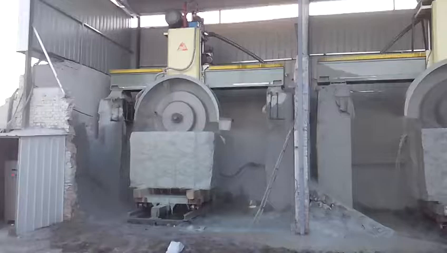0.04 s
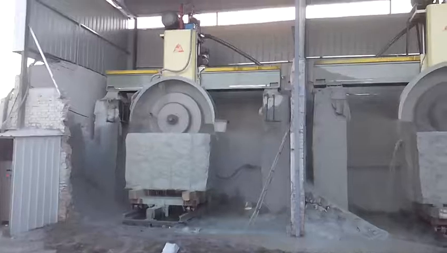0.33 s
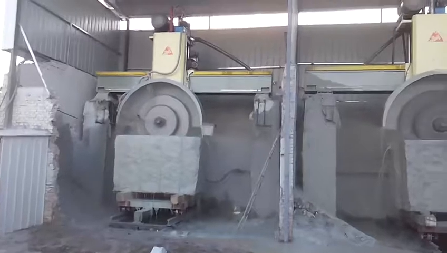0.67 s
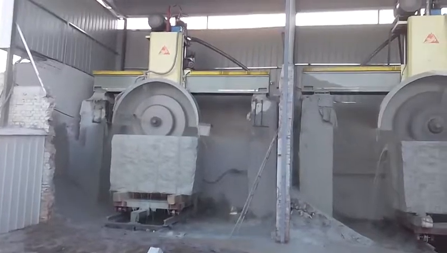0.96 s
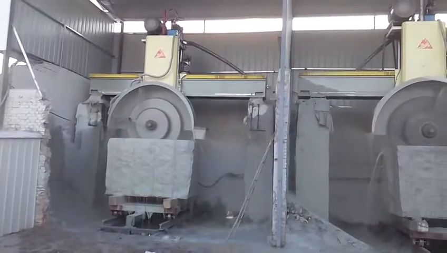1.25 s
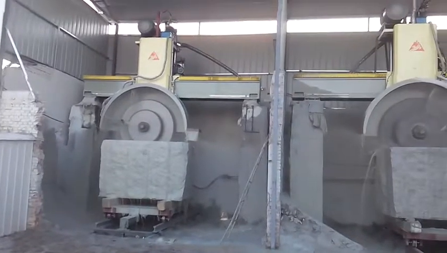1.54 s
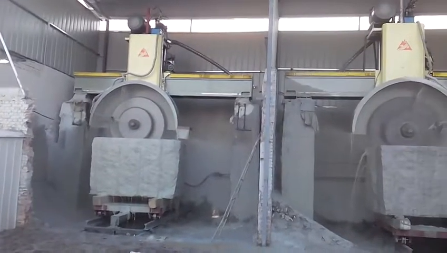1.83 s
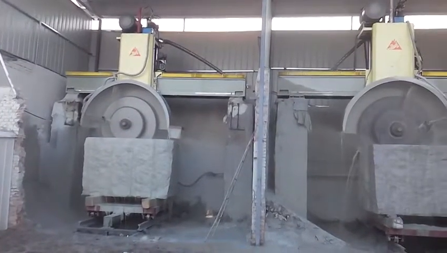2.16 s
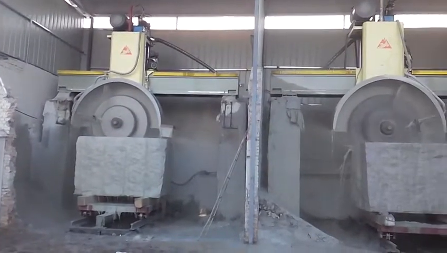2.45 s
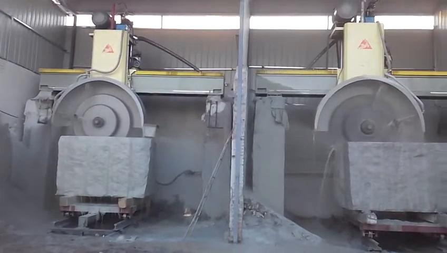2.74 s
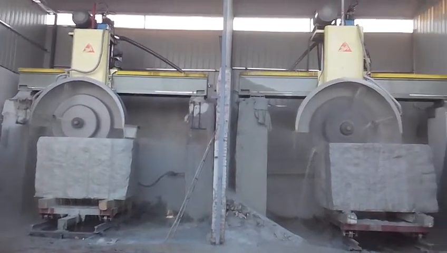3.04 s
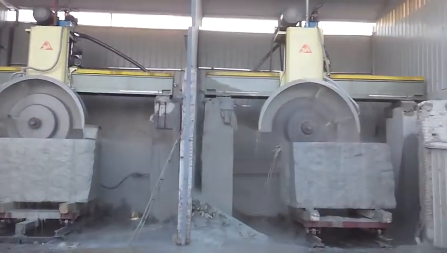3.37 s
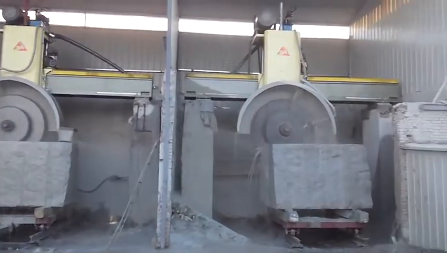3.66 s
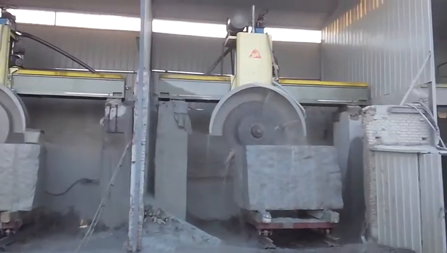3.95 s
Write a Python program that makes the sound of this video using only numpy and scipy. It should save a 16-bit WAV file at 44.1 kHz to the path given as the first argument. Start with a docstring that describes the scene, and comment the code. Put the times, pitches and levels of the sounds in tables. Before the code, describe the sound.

Big stone saws grind steadily in a shed, droning and rasping over a hiss of water.

```python
"""Stone saws in a steel shed

One mono microphone stands among two big circular saws cutting stone blocks, turning slowly between them.
The same uneven teeth meet the stone on every turn, so the blades drone and throb five times a second.
Crushed grit roars and makes the steel ring, and a binding blade squeals briefly. Behind the saws,
cooling water hisses in the cut and the shed rumbles underneath."""
import sys
import numpy as np
from scipy import signal
from scipy.fft import rfft, irfft
from scipy.io import wavfile
from scipy.ndimage import uniform_filter1d, minimum_filter1d

SR = 44100
rng = np.random.default_rng(int(sys.argv[2]) if len(sys.argv) > 2 else 0)


def wrap_up_sound(samples):
    """Save the sound to the file named by the first command line argument, as 16-bit audio."""
    columns = np.atleast_2d(samples).T
    # keep every value between -1 and 1, then stretch to whole-number steps
    tamed = np.clip(columns, -1, 1)
    steps = np.round(tamed * 32767).astype(np.int16)
    wavfile.write(sys.argv[1], SR, steps)


N = 176400
T = np.arange(N) / SR
TURNS_PER_S, CONTACTS_PER_TURN = 5.04, 480
GRAINS_PER_S, GRAIN_SPREAD_DB = 14000, 2
FLUTTER_DB, FLUTTER_HZ = 1.2, 5

# Spectra of the shed, the cooling water and the crushed stone: pitch_hz, level_db_per_hz
SHED_SPECTRUM = [(12, -67), (24, -65), (44, -78.5), (72, -68), (95, -70), (150, -68), (400, -80)]
WATER_SPECTRUM = [(1500, -60), (3500, -60), (5000, -56), (5800, -57), (6600, -59), (7300, -61.5),
                  (8200, -68.5), (10000, -73), (14000, -79.5)]
GRIT_SPECTRUM = [(110, -62), (195, -57.5), (280, -53), (380, -53.5), (520, -55.5), (700, -51), (870, -53.5),
                 (1020, -50), (1220, -53.5), (1700, -50), (2500, -54), (3100, -58), (4300, -59),
                 (7000, -78)]
# The thin ring of a blade: pitch_hz, width_hz, level_db
WHINE_MODES = [(4590, 39, -34.5), (4760, 87, -38.5)]
# Moments when the blade binds in the cut: peak_s, rise_db
BINDS = [(.31, 7), (.66, 9), (1.08, 7), (1.2, 7), (1.66, 6), (1.9, 11), (2.4, 6)]
# Steel resonances rubbed by grit: pitch_hz, width_hz, level_db, trend_db_per_s, flutter_db
STEEL_MODES = [(376.5, 104, -30.5, -0.5, -1.1), (725, 128, -29, -0.7, -0.5), (1411, 76, -31.5, -1, 3),
               (3764, 460, -31.5, -1.5, -1)]
# Each saw's rasp and the blades' sizzle at the microphone: time_s, level_db
LEFT_RASP_CURVE = [(0, -24.5), (.52, -23), (.88, -22), (1.08, -25.5), (2.5, -23.3), (4, -23)]
RIGHT_RASP_CURVE = [(0, -25.5), (2.85, -24), (3.35, -22.5), (3.6, -21.5), (4, -23.5)]
SIZZLE_CURVE = [(0, -27), (1.6, -26.5), (2.1, -25.7), (2.6, -26), (4, -27)]
# How far the microphone favours the right-hand saw: time_s, facing_db
MIC_FACING = [(0, -2.5), (1, -1.7), (2, .7), (2.7, 1.2), (4, 0)]
# Tones the blades sing: cycles_per_turn, level_db, db_per_facing_db, swell_db, swell_peak_s
BLADE_TONES = [(50, -26.4, .8, 2, .06), (54, -29.7, 1, 1, .02), (67, -30.5, 0, 8, .1),
               (138, -30.7, -.4, 2.5, .05), (150, -34.5, -2.6, 2.5, .04)]
# Resonances struck by the teeth: pitch_hz, width_hz, level_db, trend_db_per_s, swell_db, swell_peak_s
BLADE_MODES = [(80, 18, -51, 0, 1, .1), (130, 30, -41.5, 0, 1, .11), (193, 24, -31, -.4, 3, .07),
               (243, 26, -33, .6, 1, .04), (286, 40, -31, .4, 7, .14), (384, 40, -30, 0, 2, .04),
               (632, 35, -33.5, 0, 1.5, .08), (745, 80, -28, -.7, 2.5, .04), (985, 130, -32, 0, 1, .15),
               (1660, 400, -27.3, -.6, .5, .1), (2200, 450, -33, .5, .3, .1)]


def from_db(db):
    """Decibels to gain."""
    return 10 ** (np.asarray(db) / 20)


def rms_one(x):
    """Scale to rms 1."""
    return x / np.sqrt(np.mean(x ** 2) + 1e-20)


def drift(rate_hz):
    """Slow random movement, rms 1."""
    step, settle = 40, 2000
    pole = np.exp(-2 * np.pi * rate_hz * step / SR)
    noise = rng.standard_normal(N // step + settle + 2)
    slow = signal.lfilter([1], [1, -2 * pole, pole * pole], noise)[settle:]
    return np.interp(np.arange(N) / step, np.arange(len(slow)), rms_one(slow))


def colour(white, spectrum):
    """Give a white signal of rms 1 a spectrum in dB per Hz, falling away beyond its ends."""
    hz, db = np.transpose(spectrum)
    bins_hz = np.maximum(np.arange(N // 2 + 1) * SR / N, 1)
    gain = from_db(np.interp(np.log(bins_hz), np.log(hz), db))
    skirts = np.minimum(1, np.minimum(bins_hz / hz[0], hz[-1] / bins_hz)) ** 2
    return irfft(rfft(white) * gain * skirts, N) * np.sqrt(SR / 2)


def resonate(x, hz, width_hz):
    """A steep-sided resonance, rms 1."""
    edges = [max(hz - width_hz / 2, 20), hz + width_hz / 2]
    return rms_one(signal.sosfilt(signal.butter(2, edges, "band", fs=SR, output="sos"), x + 1e-18))


def swell(depth_db, peak_s):
    """A gain that rises and falls once a turn, as the wobbling blade leans on the cut."""
    return rms_one(from_db(depth_db * np.cos(2 * np.pi * TURNS_PER_S * (T - peak_s))))


def mic_turn(level_db, db_per_s):
    """A gain that slides slowly as the microphone turns from one saw to the other."""
    return from_db(level_db + db_per_s * (T - T.mean()))


def shed_rumble():
    """The shed rumbles low and steady around the microphone."""
    return colour(rng.standard_normal(N), SHED_SPECTRUM)


def cooling_water():
    """Water hisses steadily in the cut."""
    return colour(rng.standard_normal(N), WATER_SPECTRUM)


def grit():
    """Dense random fractures of uneven size, rms 1."""
    sizes = from_db(GRAIN_SPREAD_DB * np.minimum(rng.exponential(1, N), 5))
    signs = rng.choice([-1, 1], N)
    breaks = rng.random(N) < GRAINS_PER_S / SR
    return rms_one(sizes * signs * breaks)


def blade_whine(squeal_s=.028, flutter_db=1):
    """Two high modes ring together and flare into squeals when the blade binds."""
    flare_db = sum(rise_db * np.exp(-((T - peak_s) / squeal_s) ** 2) for peak_s, rise_db in BINDS)
    gain = from_db(flare_db + flutter_db * drift(FLUTTER_HZ))
    return gain * sum(from_db(db) * resonate(grit(), hz, width) for hz, width, db in WHINE_MODES)


def grinding():
    """Crushed stone roars and sets the steel ringing, fluttering with the load."""
    steel = 0
    for hz, width, db, trend, flutter_db in STEEL_MODES:
        flutter = rms_one(from_db(flutter_db * drift(FLUTTER_HZ)))
        steel += mic_turn(db, trend) * flutter * resonate(grit(), hz, width)
    left = rasp(LEFT_RASP_CURVE, hz=1706, width_hz=330)
    right = rasp(RIGHT_RASP_CURVE, hz=2268, width_hz=440)
    sizzle = rasp(SIZZLE_CURVE, hz=6204, width_hz=590)
    return steel + left + right + sizzle + colour(grit(), GRIT_SPECTRUM)


def rasp(curve, hz, width_hz):
    """Grit rubs one broad blade resonance, its level fluttering about a slow curve."""
    level_db = np.interp(T, *np.transpose(curve)) + FLUTTER_DB * drift(FLUTTER_HZ)
    return from_db(level_db) * resonate(grit(), hz, width_hz)


def blade_singing(waver_db=1.4, wander_s=.00009):
    """Strong tones locked to the turning blades; the lowest two beat into a fast flutter."""
    angle = 2 * np.pi * TURNS_PER_S * (T + wander_s * drift(rate_hz=1))
    facing_db = np.interp(T, *np.transpose(MIC_FACING))
    tones = 0
    for cycles, db, follows, swell_db, peak_s in BLADE_TONES:
        gain = from_db(db + follows * facing_db + waver_db * drift(rate_hz=3.4))
        tone = np.sqrt(2) * np.sin(cycles * angle + 2 * np.pi * rng.random())
        tones += gain * swell(swell_db, peak_s) * tone
    return tones


def teeth(slip_s=.00004, force_spread=.25):
    """One uneven pattern of contacts round the rim, met again on every turn with small changes."""
    rim_place = rng.random(CONTACTS_PER_TURN)
    strength = rng.standard_normal(CONTACTS_PER_TURN)
    turns = np.arange(int(N / SR * TURNS_PER_S) + 1)[:, None]
    contact_s = (turns + rim_place) / TURNS_PER_S + slip_s * rng.standard_normal(turns.shape)
    force = strength * (1 + force_spread * rng.standard_normal(contact_s.shape))
    samples = np.abs(contact_s * SR).astype(int)
    return np.bincount(samples.ravel(), force.ravel(), N)[:N]


def blade_drone():
    """The teeth drive the blade's resonances into a churning drone."""
    contacts = teeth()
    return sum(mic_turn(db, trend) * swell(swell_db, peak_s) * resonate(contacts, hz, width)
               for hz, width, db, trend, swell_db, peak_s in BLADE_MODES)


def scene():
    """Saws in front, water and shed behind, the same in both channels."""
    saws = blade_drone() + blade_singing() + grinding() + blade_whine()
    return np.tile(saws + cooling_water() + shed_rumble(), (2, 1))


def record(dry):
    """The microphone cuts in, a fast limiter holds the peaks and the top treble is cut."""
    start_s, fade_s = .118, .002
    limit_db, limiter_s, cutoff_hz = -2.4, .002, 14000
    x = dry * np.clip((T - start_s) / fade_s, 0, 1)
    window = int(limiter_s * SR)
    gain = np.minimum(1, from_db(limit_db) / (np.abs(x[0]) + 1e-9))
    limited = x * uniform_filter1d(minimum_filter1d(gain, window), window)
    lowpass = signal.ellip(12, .1, 80, cutoff_hz, fs=SR, output="sos")
    return signal.sosfilt(lowpass, limited + 1e-18)


dry = scene()
out = record(dry)
wrap_up_sound(out)
```